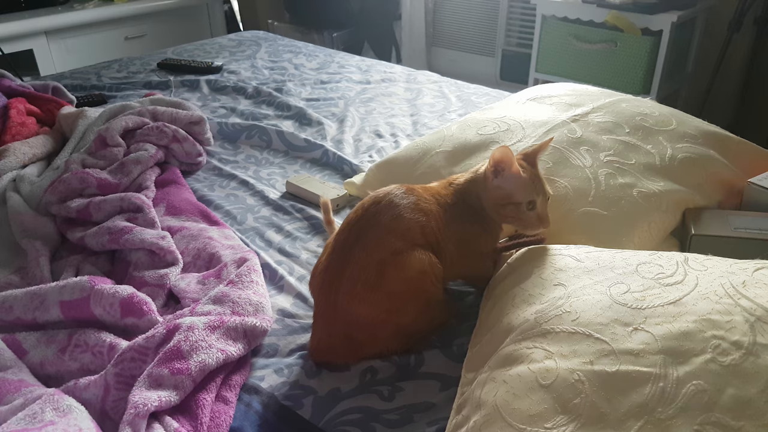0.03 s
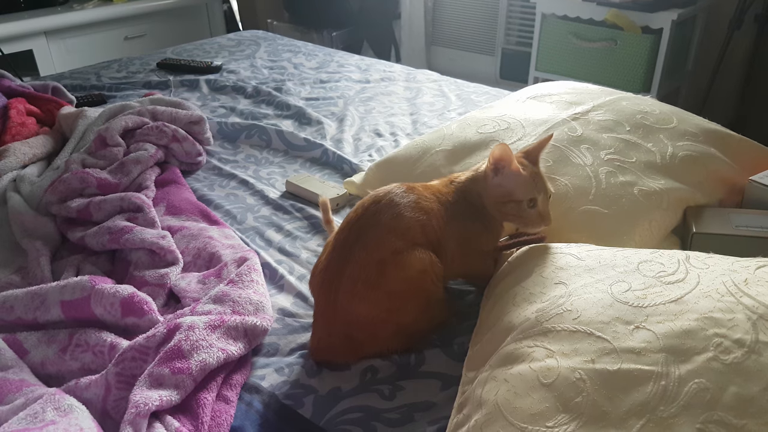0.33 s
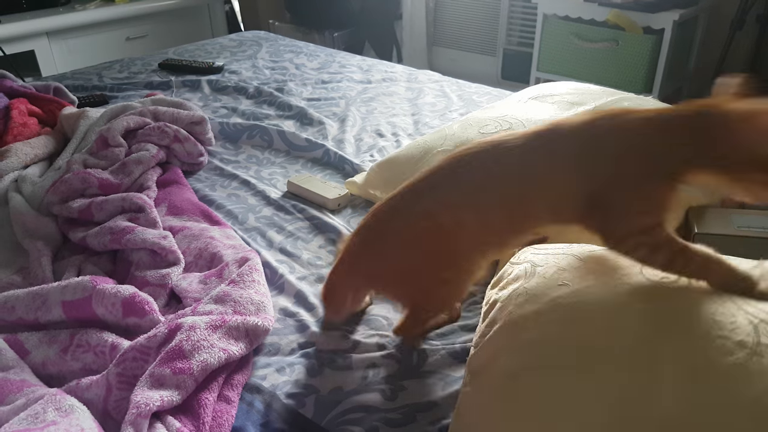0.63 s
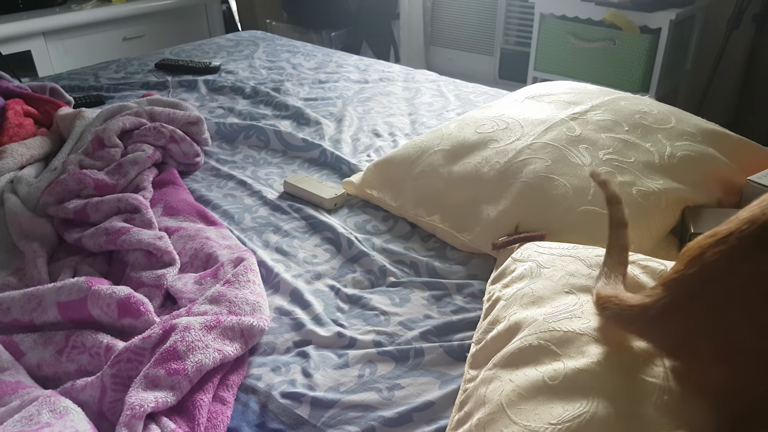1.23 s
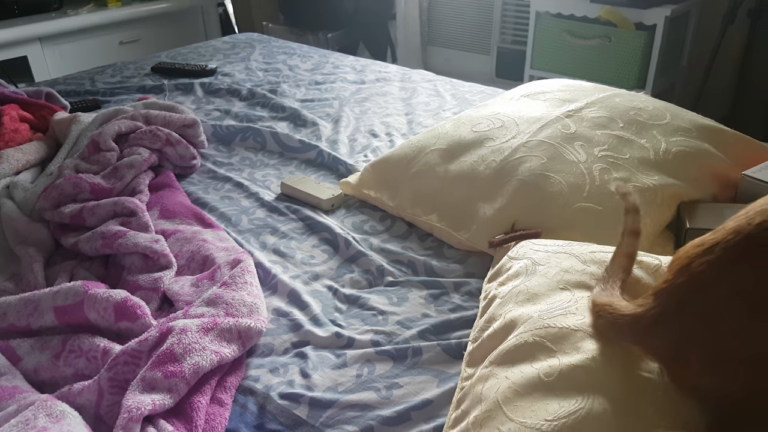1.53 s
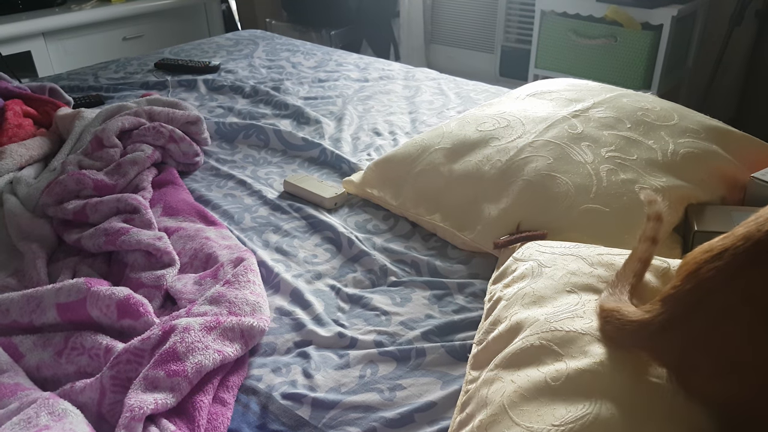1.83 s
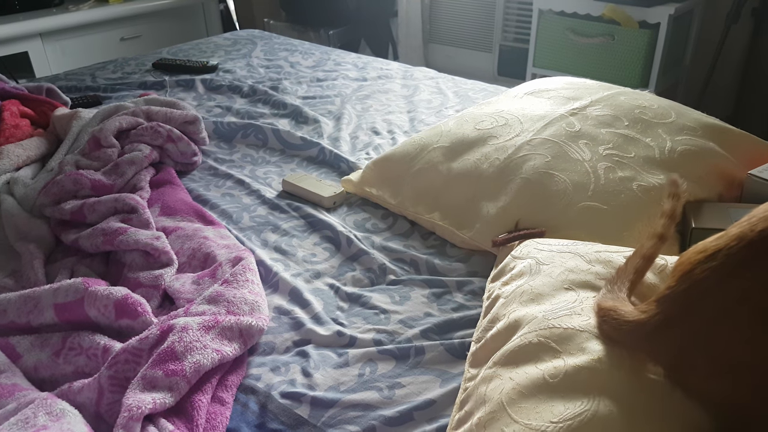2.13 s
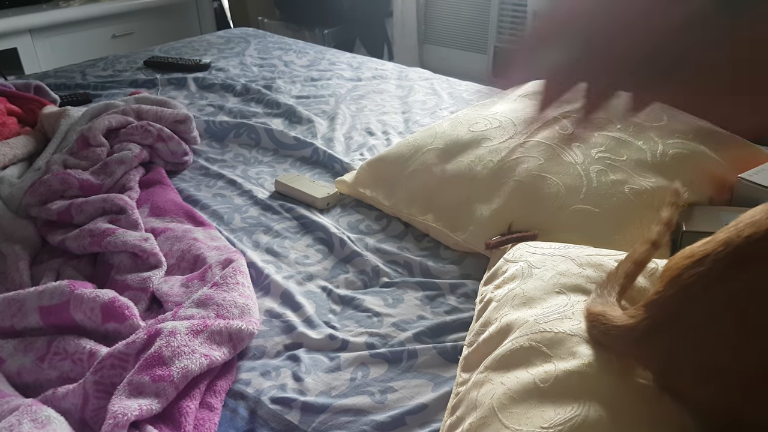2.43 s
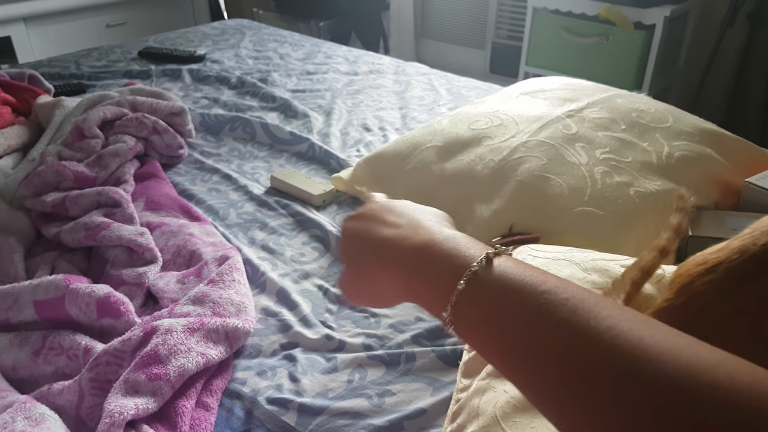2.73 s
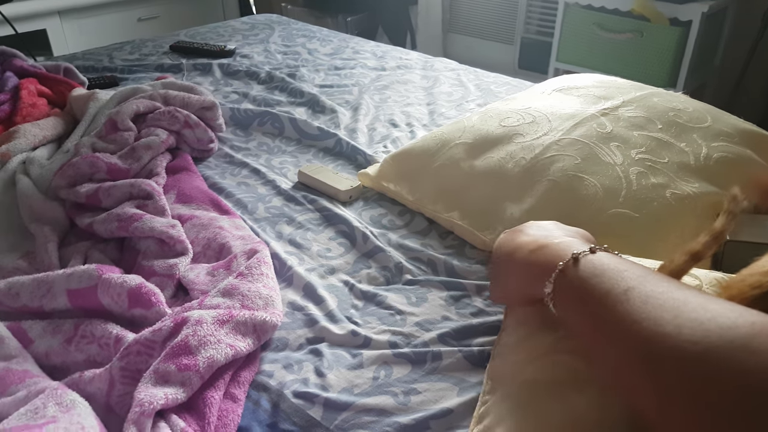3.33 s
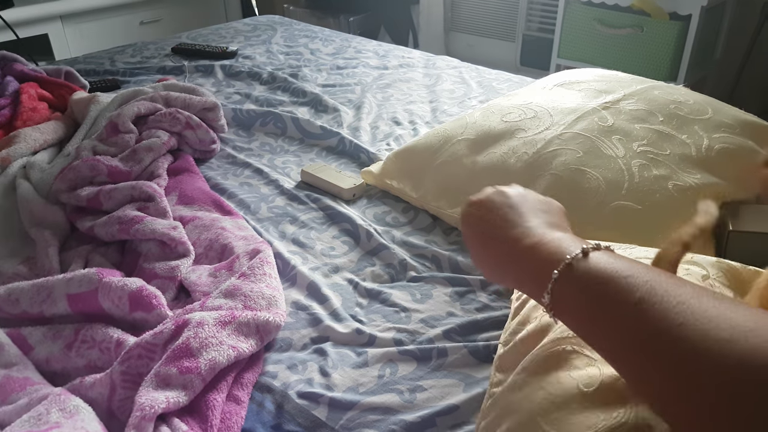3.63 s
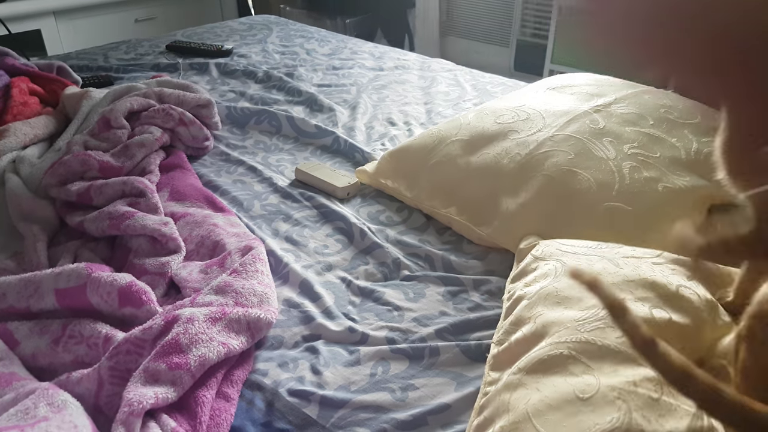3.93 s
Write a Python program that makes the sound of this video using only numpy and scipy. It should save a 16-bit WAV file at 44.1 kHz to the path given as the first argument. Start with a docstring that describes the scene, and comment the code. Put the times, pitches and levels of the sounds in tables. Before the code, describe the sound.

A nearby kitten trills into a single clear mew in a small bedroom. Afterwards a fan's steady low drone and thin whine carry on, with faint sliding cloth and a couple of dull paw pats on pillows.

```python
"""A fan hums and whines in a small bedroom: a low drone, wavering tones and a wash of air.
The bedding rustles faintly as cloth slides, and a kitten on the bed gives one call. Its vocal folds
flutter in a trill, then settle into a clear, rising mew shaped by the mouth; the room rings briefly.
Two tiny dry ticks sound, and paws pat the pillows twice, just as the mew ends and again much later."""
import sys
import numpy as np
from scipy import signal
from scipy.fft import rfft, irfft
from scipy.io import wavfile

SR = 44100
rng = np.random.default_rng(int(sys.argv[2]) if len(sys.argv) > 2 else 0)


def master_out(mix):
    """Clip the mix to full scale and print it as 16-bit PCM to the path in sys.argv[1]."""
    frames = np.transpose(np.atleast_2d(mix))
    ceiling = np.clip(frames, -1, 1)
    pcm = np.round(ceiling * 32767).astype(np.int16)
    wavfile.write(sys.argv[1], SR, pcm)


N = 176400


def undb(db):
    """Decibels to gain."""
    return 10 ** (np.asarray(db) / 20)


def unit(x):
    """Scale to rms 1."""
    return x / np.sqrt(np.mean(x ** 2))


def curve(table, t, column=1):
    """One column of a table as a breakpoint envelope."""
    rows = np.array(table, float)
    return np.interp(t, rows[:, 0], rows[:, column])


def per_bin(points):
    """Spectrum points joined on a log-frequency axis."""
    hz, value = np.array(points, float).T
    return np.interp(np.log(np.arange(N // 2 + 1) * SR / N + 1), np.log(hz), value)


def drift(rate_hz):
    """Smooth random modulation with rms 1."""
    hz = np.arange(N // 2 + 1) * SR / N
    return unit(irfft(rfft(rng.standard_normal(N)) * np.exp(-(hz / rate_hz) ** 2), N))


def pan(pan_db):
    """Constant-power stereo gains; pan is left minus right."""
    return unit(undb(np.array([[pan_db], [-pan_db]]) / 2))


def tone(phase, pan_db, lead):
    """A panned sine whose left side leads in phase."""
    return pan(pan_db) * np.sin(phase + np.array([[lead], [-lead]]) / 2)


# Stereo tilt of noise in the room (frequency [Hz], pan [dB])
NOISE_PAN = [(60, 0), (150, -2.5), (400, 3), (700, -5), (1290, .5), (2380, -2.5), (4400, -6.5), (8120, -1),
             (15000, 0.5)]
# Likeness of left and right (frequency [Hz], correlation [0-1])
NOISE_CORRELATION = [(130, 0.95), (290, 0.85), (480, 0.93), (700, 0), (15000, 0)]


def room_noise(colour_db):
    """Coloured noise with rms 1, nearly mono in the bass and wide above."""
    likeness = per_bin(NOISE_CORRELATION)
    mid, side = rfft(rng.standard_normal((2, N)))
    sides = np.array([[1], [-1]])
    stereo = mid * np.sqrt(1 + likeness) + sides * side * np.sqrt(1 - likeness)
    return unit(irfft(stereo * undb(colour_db + sides * per_bin(NOISE_PAN) / 2), N))


# Colour of the fan's low drone (frequency [Hz], relative level [dB])
DRONE_EQ = [(20, -24), (40, -16.5), (57, 1), (65, -6.5), (77, -7), (92, -14), (114, -1.5), (132, 2.5),
            (150, -14), (175, -5), (210, -15.5), (260, -36.5), (500, -74)]
# Colour of the air wash before its low cut (frequency [Hz], relative level [dB])
AIR_EQ = [(120, -29), (200, -3), (235, -3), (260, -9), (330, -11.5), (510, -7), (570, -11.5), (760, -12.5),
          (860, -17), (1150, -18), (2000, -23.5), (2900, -30), (3600, -29), (5400, -38), (8300, -37.5),
          (9300, -42), (11000, -41.5), (13000, -37.5), (15500, -37.5)]
# The fan's whine (frequency [Hz], level [dB], pan [dB], left phase lead [rad])
WHINE_TONES = [(290.4, -63.5, -6.5, 0.32), (461.5, -64.5, 0, 0.61), (481.5, -66, -9, .4),
               (518.8, -64, 5.5, 0.21), (807, -58, -2.5, 2.65), (868, -74.5, 8, 1.5),
               (924.8, -60.5, 1, 1.2)]


def fan(t):
    """A running fan lays down a low drone, a wash of air and wavering tones."""
    drone_db, air_db = -47, -54.5
    pitch_wander, waver_db = .0022, 1.05
    low_cut = per_bin([(100, -39), (200, 0)])
    out = undb(drone_db) * room_noise(per_bin(DRONE_EQ))
    out += undb(air_db) * room_noise(per_bin(AIR_EQ) + low_cut)
    for hz, db, pan_db, lead in WHINE_TONES:
        phase = 2 * np.pi * np.cumsum(hz * (1 + pitch_wander * drift(12))) / SR
        out += np.sqrt(2) * undb(db + waver_db * drift(13)) * tone(phase, pan_db, lead)
    return out


# Swells of sliding cloth (peak time [s], width [s], level [dB])
CLOTH_SWELLS = [(.78, 0.37, -64), (2.52, 0.36, -65.5), (2.6, 0.11, -66.5), (3.95, 0.12, -70)]
# Colour of the cloth (frequency [Hz], relative level [dB])
CLOTH_EQ = [(200, 5), (800, 0), (2000, 3), (4500, -7.5), (8000, -8.5), (10000, -17.5), (15000, -16)]


def bedding_rustles(t):
    """Sliding cloth makes soft, grainy swells of noise."""
    grain_db = 1.5
    swells = sum(undb(db) * np.exp(-((t - at) / width) ** 2) for at, width, db in CLOTH_SWELLS)
    return swells * undb(grain_db * drift(62)) * room_noise(per_bin(CLOTH_EQ))


# Pitch contour of the call (time [s], pitch [Hz])
CALL_PITCH = [(.458, 636.4), (.474, 591.4), (.535, 607.4), (.565, 584), (.61, 598.4), (.632, 619.3),
              (.66, 625), (.673, 608), (.686, 631.8), (.73, 633.7), (.836, 624.6), (.866, 659),
              (.888, 650.4), (.91, 665), (.921, 703.3), (.942, 701), (.958, 676), (.985, 675)]
# Base envelopes of the harmonics
# (time [s], 1st [dB], 2nd [dB], 3rd [dB], 4th [dB], 5th and 6th [dB], 7th [dB], 8th and up [dB])
CALL_ENVELOPES = [(.458, -43, -53, -74, -75, -80, -78, -75), (.478, -33.5, -45, -50.5, -67, -61, -61, -71),
                  (.535, -39.5, -44, -45.5, -48.5, -56, -63, -73),
                  (.59, -39, -51.5, -50.5, -60, -71, -62, -77),
                  (.64, -38, -41, -51.5, -52.5, -59, -49.5, -70),
                  (.68, -39, -43, -54, -46.5, -58, -65, -70),
                  (.715, -36, -33.5, -56, -30, -54.5, -70, -57.5),
                  (.76, -43, -34, -45, -40, -52, -67, -57.5),
                  (.83, -46, -37.5, -45.5, -45.5, -60, -65, -56.5),
                  (.868, -33, -50, -35.5, -41.5, -47, -55, -54),
                  (.895, -35.5, -42, -43.5, -46, -62, -60.5, -72),
                  (.93, -33.5, -39, -33, -58, -78, -70, -69), (.96, -37, -40.5, -49, -63, -70, -66, -72),
                  (.985, -37.5, -49, -64, -69, -78, -76, -72)]
# Envelope that each harmonic follows (column of CALL_ENVELOPES [index])
ENVELOPE_ROUTING = [1, 2, 3, 4, 5, 5, 6, 7, 7, 7, 7, 7, 7]
# Mix of the harmonics, lowest first (trim [dB], pan [dB], left phase lead [rad])
HARMONIC_MIX = [(0.5, -3, -1.1), (-2.5, 4, -2.5), (2, 5.5, 1.48), (2, -7, -1.77), (-10, 2.5, -1.5),
                (0, -11, 1.5), (1, -8.5, 4), (-9.5, -2, -1.6), (-8, -1, -2), (-12.5, -9, -4.5),
                (-14, -13, 5), (-8, -9, -2.3), (-17.5, -6, 4.5)]
# Mouth resonance, sweeping down as the mew closes (time [s], centre [Hz])
MOUTH_SWEEP = [(.69, 7800), (.725, 6400), (.775, 6060), (.81, 5730), (.84, 5100), (.875, 4280), (.95, 4470)]


def kitten_call(t):
    """Vocal folds flutter in pitch and level, then settle into a clean tone shaped by the mouth."""
    start_s, end_s, attack_s, release_s = .458, .99, .003, .014
    trill_end_s, trill_fade_s = .66, .07
    trill_hz, swing_hz, crest_s, throb_lead_s = 47.32, 24.5, .495, .0029
    clear_jitter, trill_jitter = .0018, .0111
    clear_rasp_db, trill_rasp_db = -31, -16.5
    mouth_boost_db, mouth_width_hz, voice_db = 10, 290, -.5

    trill = np.clip((trill_end_s - t) / trill_fade_s, 0, 1)  # 1 in the trill, 0 in the mew
    flutter = trill * np.cos(2 * np.pi * trill_hz * (t - crest_s))
    throb = trill * np.cos(2 * np.pi * trill_hz * (t - crest_s + throb_lead_s))
    jitter = (clear_jitter + trill_jitter * trill) * drift(160)
    pitch = curve(CALL_PITCH, t) + swing_hz * flutter
    phase = 2 * np.pi * np.cumsum(pitch * (1 + jitter)) / SR
    rasp = undb(clear_rasp_db + (trill_rasp_db - clear_rasp_db) * trill)
    mouth_hz = curve(MOUTH_SWEEP, t)
    out = 0
    for k, (column, (trim_db, pan_db, lead)) in enumerate(zip(ENVELOPE_ROUTING, HARMONIC_MIX), 1):
        mouth_db = mouth_boost_db * np.exp(-((k * pitch - mouth_hz) / mouth_width_hz) ** 2)
        tremolo_db = (2.2 + .6 * k) * throb  # higher harmonics pulse deeper
        level = undb(curve(CALL_ENVELOPES, t, column) + trim_db + mouth_db + tremolo_db)
        roughness = 1 + rasp * drift(256)
        out += level * roughness * tone(k * phase, pan_db, lead)
    gate = np.clip((t - start_s) / attack_s, 0, 1) * np.clip((end_s - t) / release_s, 0, 1)
    return out * gate * undb(voice_db)


# Tick cues (time [s], level before filtering [dB], centre [Hz])
TICK_CUES = [(0.703, -29, 2670), (2.033, -37.5, 3880)]


def ticks(t):
    """Tiny dry clicks off to the right, each ringing one broad resonance."""
    decay_s = .0015
    out = 0
    for at, db, hz in TICK_CUES:
        burst = rng.standard_normal(N) * (t > at) * np.exp(-np.abs(t - at) / decay_s)
        b, a = signal.iirpeak(hz, Q=3.3, fs=SR)
        out += undb(db) * signal.lfilter(b, a, signal.lfilter(b, a, burst))
    return out * pan(pan_db=-14)


# Paw hits (time [s], level [dB])
PAT_CUES = [(0.976, -40.5), (3.937, -45)]
# Muffled colour of a pat (frequency [Hz], relative level [dB])
PAT_EQ = [(50, -12), (130, -5), (450, -9.5), (900, -9), (2000, -40), (8000, -47)]


def paw_pats(t):
    """Paws land on the pillows with dull, brief thuds."""
    attack_s, decay_s = .0062, .012
    envelope = 0
    for at, db in PAT_CUES:
        rise = np.clip((t - at) / attack_s, 0, 1)
        fall = np.exp(-np.maximum(t - at - attack_s, 0) / decay_s)
        envelope += undb(db) * rise * fall
    return envelope * room_noise(per_bin(PAT_EQ))


def bedroom_reverb(x, t):
    """Add the short, diffuse ring of the bedroom."""
    t60_s, predelay_s, wet_db = .25, .0079, -5.5
    age = t[:SR // 2]
    tail = rng.standard_normal((2, len(age))) * undb(-60 * age / t60_s) * (age > predelay_s)
    tail /= np.sqrt(np.sum(tail ** 2, axis=1, keepdims=True))
    return x + undb(wet_db) * signal.fftconvolve(x, tail, axes=1)[:, :N]


def scene():
    """The call and ticks ring in the room, over the pats, the rustles and the fan."""
    t = np.arange(N) / SR
    foreground = bedroom_reverb(kitten_call(t) + ticks(t), t)
    return foreground + paw_pats(t) + bedding_rustles(t) + fan(t)


def record(dry):
    """A steep low-pass takes off the very top of the treble."""
    cutoff_hz = 15750
    return signal.sosfilt(signal.ellip(10, .1, 70, cutoff_hz, fs=SR, output="sos"), dry)


dry = scene()
out = record(dry)
master_out(out)
```